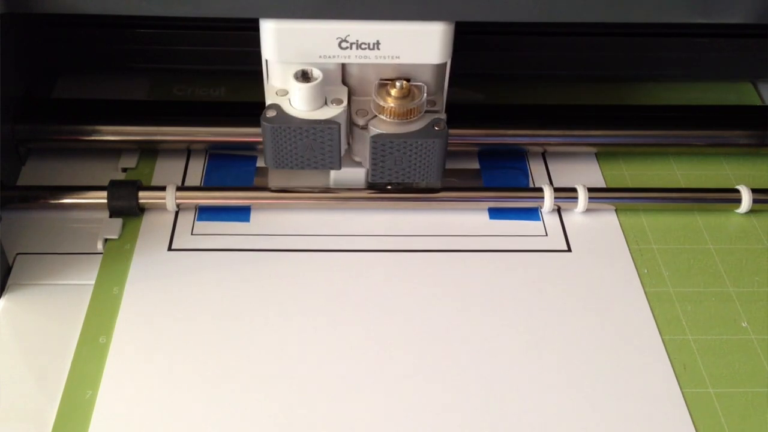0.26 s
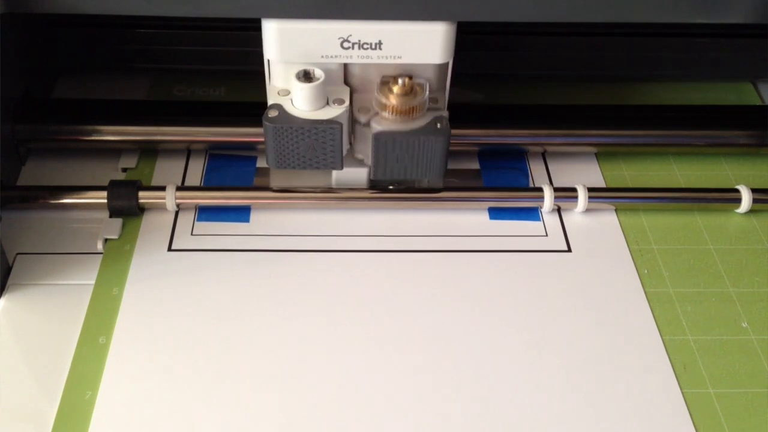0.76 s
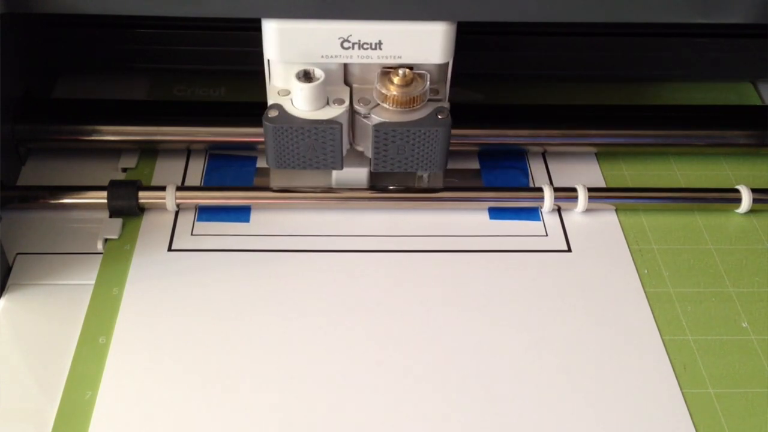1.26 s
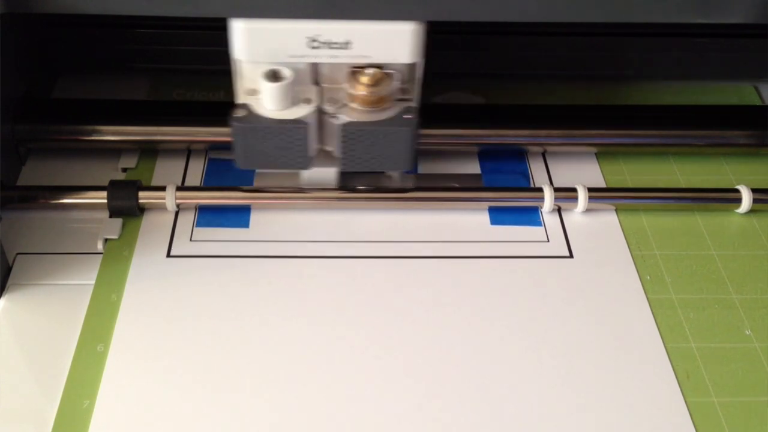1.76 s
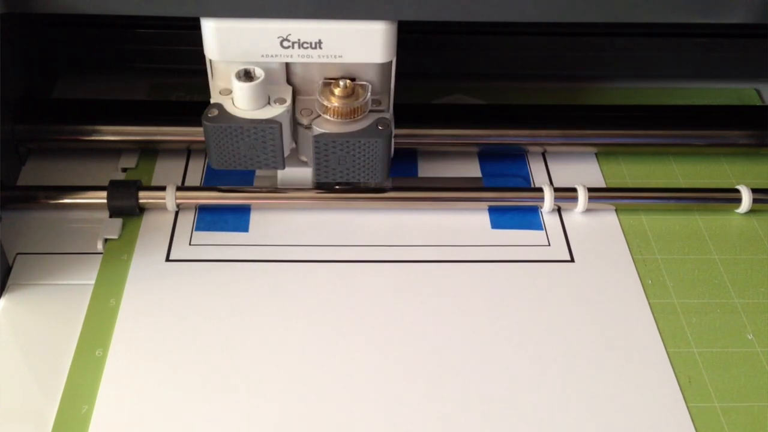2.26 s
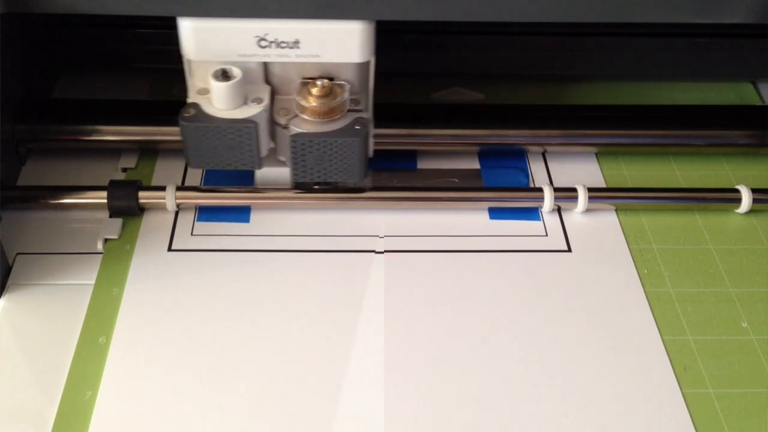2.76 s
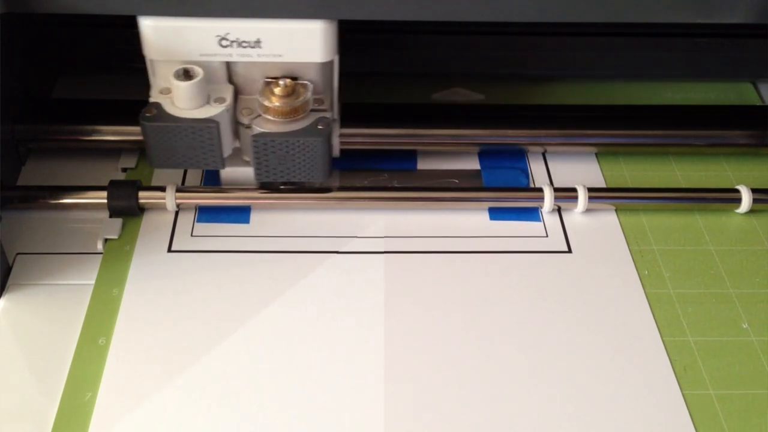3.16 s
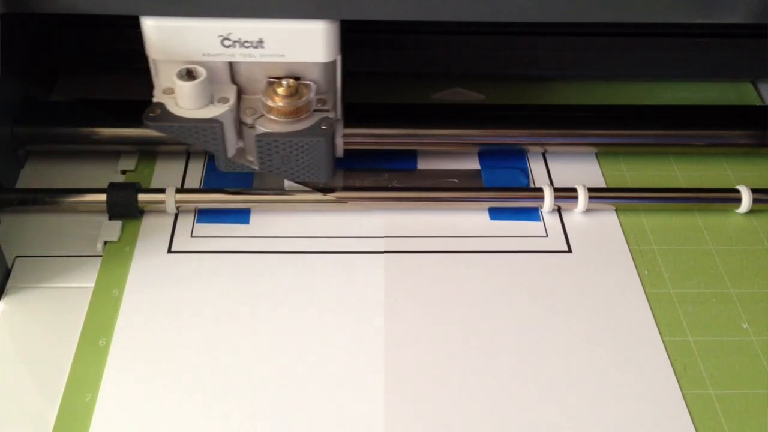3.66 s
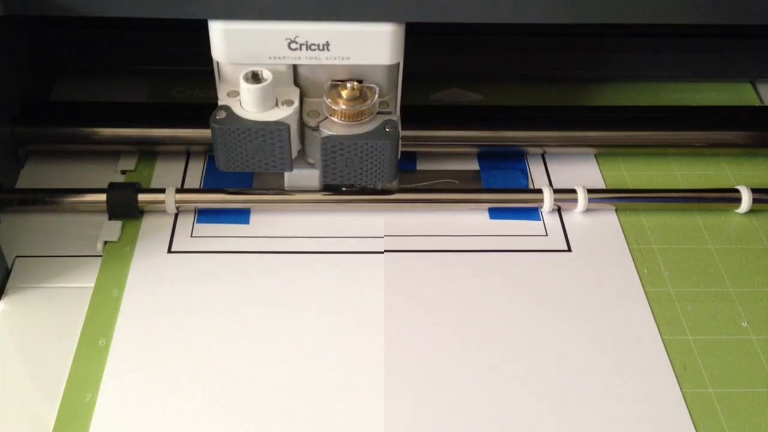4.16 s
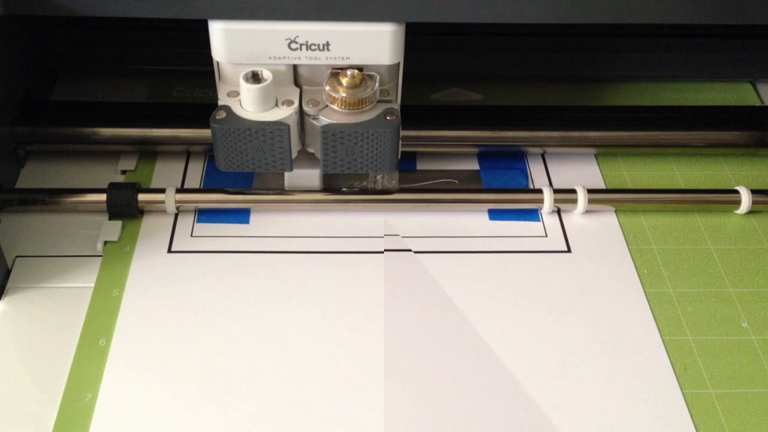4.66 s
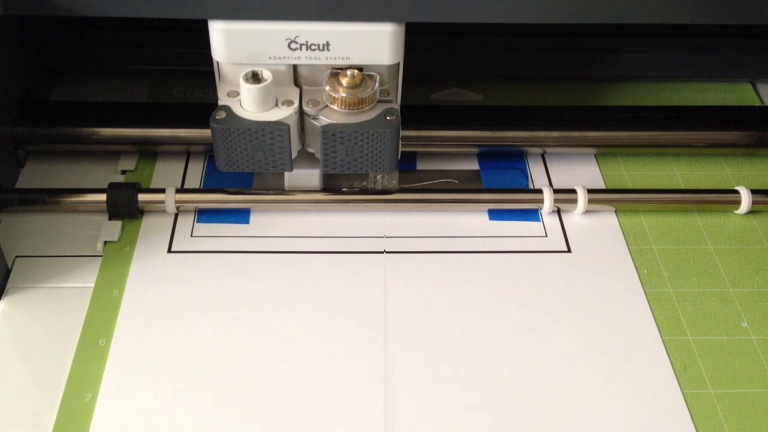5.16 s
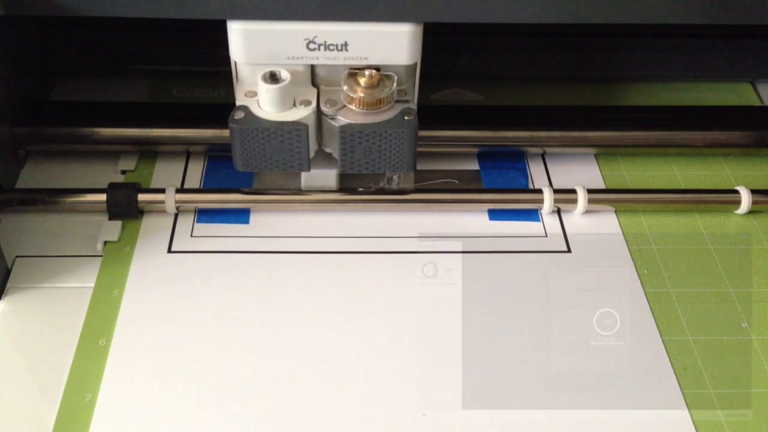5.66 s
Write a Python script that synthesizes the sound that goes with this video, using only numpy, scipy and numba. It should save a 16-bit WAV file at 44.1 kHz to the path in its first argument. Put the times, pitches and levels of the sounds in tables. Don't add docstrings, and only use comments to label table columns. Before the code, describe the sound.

Close in a quiet room, a desktop craft cutter starts with a feed whirr and clustered plastic knocks. A pause, a brisk carriage whirr and another roller burst follow, then uneven ticking and rattling as it engraves metal. Everything fades steadily to near silence, ending with a puff of thin hiss and tiny clicks.

```python
import sys
import numpy as np
from scipy import signal
from scipy.fft import rfft, irfft
from scipy.io import wavfile
from scipy.ndimage import uniform_filter1d
from numba import njit

SR = 44100
rng = np.random.default_rng(int(sys.argv[2]) if len(sys.argv) > 2 else 0)


def materialize(psi):
    bounded = np.clip(np.atleast_2d(psi).T, -1, 1)
    quanta = np.round(bounded * 32767).astype(np.int16)
    wavfile.write(sys.argv[1], SR, quanta)


def amplitude_ratio(level_db):
    exponent = np.asarray(level_db, float) / 20
    return 10 ** exponent


N = 260190

# [start t/s, top speed t/s, stop t/s, whirr level/dB, drone rel. to whirr/dB]
ROLLER_RUNS = [
    (-.06, 0.033, .17, -43, 3),
    (0.736, 0.843, 0.94, -42, -1.5),
    (2.092, 2.244, 2.355, -44, 1),
]
# [f/Hz, width/Hz, level/dB]
CLACK_MODES = [(1930, 200, -3), (2255, 220, 1), (2550, 310, -2), (2884, 270, 0), (3280, 340, -8.5)]


@njit
def svf(x, hz, width):
    y, band, low = np.empty(len(x)), 0., 0.
    g, k = np.tan(np.pi * hz / SR), width / hz
    for i in range(len(x)):
        floor = 1e-15 * (i & 15)
        v = (band + g * (x[i] + floor - low)) / (1 + g * (g + k))
        band = 2 * v - band
        low += 2 * g * v
        y[i] = k * v
    return y


def unit(x):
    return x / np.sqrt(np.mean(x ** 2))


def body(drive, modes):
    power = sum(amplitude_ratio(db) ** 2 * 2 / SR * width for _, width, db in modes)
    out = np.zeros(len(drive))
    for k, (hz, width, db) in enumerate(modes):
        ring = svf(svf(drive, 1. * hz, 1. * width), 1. * hz, 2. * width)
        out += (-1) ** k * amplitude_ratio(db) * ring
    return out / np.sqrt(power)


def level_curve(points):
    off_db = -130
    rows = [(points[0][0] - .006, off_db), *points, (points[-1][0] + .002, off_db)]
    s, db = np.transpose(rows)
    return np.interp(np.arange(N) / SR, s, db)


def coloured(spectrum):
    hz, db = np.transpose(spectrum)
    f = np.arange(N // 2 + 1) * SR / N + 1
    gain = amplitude_ratio(np.interp(np.log(f), np.log(hz), db, right=-90))
    return unit(irfft(rfft(rng.standard_normal(N)) * gain, N))


def rattle(rate, scatter_db):
    at = np.arange(0, N + SR / rate, SR / rate)
    jumps = np.minimum(rng.exponential(size=len(at)), 2.5)
    strength = np.interp(np.arange(N), at, amplitude_ratio(scatter_db * jumps))
    return unit(strength * rng.standard_normal(N))


def swell(t, start, stop, power):
    return np.sin(np.pi * np.clip((t - start) / (stop - start), 0, 1)) ** power


def snap(hz, width, decay_s, noise):
    u = np.arange(len(noise)) / SR / decay_s
    y = svf(svf(noise * u * np.exp(-u), 1. * hz, 1. * width), 1. * hz, 2 * width)
    return y / np.abs(y).max()


def fade_db(t):
    from_s, to_s = 2.06, 5.72
    return 20 * np.log10(np.clip((to_s - t) / (to_s - from_s), 1e-4, 1))


def room_tone():
    # [f/Hz, level per Hz/dB]
    air_colour = [(18, -42), (30, -16.5), (59, -4.5), (140, -13.5), (219, -5.5), (249, -20), (307, -15),
                  (1400, -29.5), (2990, -24.5), (3590, -24), (15500, -26.5)]
    air_db, whistle_db, whistle_hz = -67, -74, 15000
    t = np.arange(N) / SR
    idle = uniform_filter1d(1. * (t > 1.0) * (t < 1.66), size=4000)
    driving = uniform_filter1d(1. * (t > 1.6) * (t < 2.4), size=4000)
    flicker = uniform_filter1d(np.abs(rattle(27, 3.6)), 400)
    tone = flicker * np.sin(2 * np.pi * whistle_hz * t)
    whistle = tone + 0.25 * unit(svf(rng.standard_normal(N), 1. * whistle_hz, 250.))
    air = amplitude_ratio(air_db - 2.0 * idle) * coloured(air_colour)
    whistle = amplitude_ratio(whistle_db + 4 * driving - 3 * idle + .5 * fade_db(t)) * whistle
    return amplitude_ratio(fade_db(t)) * (air + whistle)


def second_microphone():
    # [t/s, level/dB]
    gate = [
        (5.606, -61),
        (5.63, -56.5),
        (5.688, -56),
        (5.694, -65),
        (5.73, -60.5),
        (5.794, -65),
        (5.8, -73),
        (5.9, -78),
    ]
    # [f/Hz, width/Hz, level/dB]
    early_bands = [(5660, 440, -14), (8000, 1300, -5.5), (8540, 510, -2.5), (9700, 1200, -7.5),
                   (11400, 400, -4), (12300, 1000, 1), (13300, 1300, 0), (14900, 1500, -4)]
    late_bands = [(5730, 360, -8.5), (6830, 300, -10), (7670, 560, 0), (9500, 1700, -10), (11200, 400, -5),
                  (12400, 900, 0.5), (13400, 1200, 1), (14800, 1400, -4)]
    # [t/s, snap level/dB, snap f/Hz, ring level/dB]
    clicks = [
        (5.8145, -49.5, 12060, -101),
        (5.8283, -45.5, 5900, -55),
        (5.8755, -62, 10500, -63),
    ]
    hiss_db = level_curve(gate)
    rumble = unit(body(rng.standard_normal(N), [(40., 50., 0)]))
    slide = np.interp(np.arange(N) / SR, (5.68, 5.73), [0, np.pi / 2])
    grain = rattle(200, 0.8)
    early, late = unit(body(grain, early_bands)), unit(body(grain, late_bands))
    out = amplitude_ratio(hiss_db) * (np.cos(slide) * early + np.sin(slide) * late)
    t = np.arange(-800, 800) / SR
    ring = np.zeros(N)
    for s, snap_db, hz, ring_db in clicks:
        i = int(s * SR)
        out[i:i + 300] += amplitude_ratio(snap_db) * snap(hz, hz * 0.83, 0.00039, rng.standard_normal(300))
        tone = np.sin(2 * np.pi * 1500 * t) + amplitude_ratio(snap_db + 25.0) * np.sin(2 * np.pi * 3120 * t)
        envelope = np.exp(-np.abs(t) / 0.0025) + 0.081 * np.cos(t * SR / 510)
        ring[i - 760:i + 840] += amplitude_ratio(ring_db) * envelope * tone
    band = signal.ellip(6, .5, 60, [5150, 15900], "bandpass", fs=SR, output="sos")
    return signal.sosfilt(band, out) + ring + (hiss_db > -100) * amplitude_ratio(-78.5) * rumble


def hums():
    # [start t/s, stop t/s, f/Hz, level/dB]
    holds = [
        (1.653, 1.742, 139.4, -57.5),
        (2.373, 2.538, 130, -56.5),
        (4.964, 5.13, 165.8, -71),
    ]
    t = np.arange(N) / SR
    waver = np.cumsum(unit(svf(rng.standard_normal(N), 8.9, 25.0))) / SR
    out = np.zeros(N)
    for start, stop, hz, db in holds:
        tone = np.sin(2 * np.pi * hz * (t + 0.14 * waver))
        out += amplitude_ratio(db + 9.0) * swell(t, start, stop, 0.47) * tone
    return out


def rubs():
    # [start t/s, stop t/s, f/Hz, width/Hz, level/dB]
    rub_spans = [(3.49, 3.62, 7400, 1400, -65), (2.735, 2.82, 4800, 100, -72), (3.21, 3.26, 9200, 300, -76),
                 (1.73, 1.8, 14500, 900, -70), (2.08, 2.34, 4700, 210, -61), (2.08, 2.22, 8800, 590, -60.5),
                 (.755, .93, 2590, 250, -49.5), (2.75, 3.05, 1250, 32, -58.5),
                 (3.28, 3.34, 1280, 100, -51.5), (2.46, 2.8, 1150, 330, -55),
                 (2.079, 2.096, 1620, 200, -42), (0.92, 1.04, 113, 91, -57), (2.82, 3.05, 4800, 90, -77),
                 (3.36, 3.42, 12400, 400, -74), (.41, 0.5, 1000, 210, -50.5), (2.79, 3.02, 1650, 36, -65.5),
                 (4.49, 4.56, 130, 88, -55), (2.77, 2.83, 138, 43, -52.5), (3.7, 4.16, 137, 29, -64.5),
                 (4.86, 4.96, 134, 40, -64), (1.08, 1.14, 198, 46, -54.5), (2.39, 2.44, 1450, 140, -54.5),
                 (.455, .535, 7000, 4000, -58), (5.47, 5.58, 1250, 89, -82), (2.74, 2.8, 1600, 99, -56),
                 (2.95, 3.4, 650, 150, -61.5), (0.3, 0.4, 1200, 150, -46), (1.64, 1.72, 560, 71, -54.5),
                 (2.08, 2.395, 5400, 110, -62.5), (4.83, 4.86, 1270, 130, -56), (1.97, 2.04, 100, 78, -59),
                 (3.78, 3.9, 1060, 80, -63), (.745, 0.952, 3350, 200, -49.5),
                 (0.7115, .726, 3310, 90, -49.5), (.78, 0.927, 1700, 252, -53), (.828, .875, 340, 150, -39),
                 (1.075, 1.095, 1540, 130, -44.5), (2.18, 2.33, 3350, 140, -57.5),
                 (2.19, 2.3, 2450, 200, -53), (2.385, 2.43, 2500, 1200, -64)]
    t = np.arange(N) / SR
    out = np.zeros(N)
    for start, stop, hz, width, db in rub_spans:
        friction = amplitude_ratio(db) * swell(t, start, stop, 0.51) * rattle(90, 4.3)
        out += body(friction, [(hz, width, 0)])
    return out


def roller_levels():
    # [t/s, whirr level/dB]
    jolts = [
        (0.047, -45),
        (0.12, -44.5),
        (0.755, -46),
        (0.826, -35.5),
    ]
    slow_db = (14.5, 20, 16)
    brush_db = -5
    t = np.arange(N) / SR
    out = np.zeros((3, N))
    for start, top, stop, db, drone_db in ROLLER_RUNS:
        ramp = np.where(t < top, (top - t) / (top - start), (t - top) / (stop - top))
        slow = np.clip(ramp, 0, 1)
        ends_db = 450 * np.clip(t - stop, 0, None) + 40 * np.clip((start - t) / 0.015, 0, None)
        relative_db = np.array([[0], [drone_db], [brush_db]])
        out += amplitude_ratio(db + relative_db - np.outer(slow_db, slow) - ends_db)
    for s, db in jolts:
        out[0] += amplitude_ratio(db) * np.exp(-np.abs(t - s) / 0.0053)
    return out


def rollers():
    # [f/Hz, width/Hz, level/dB]
    whirr_modes = [(1002, 45.1, -10), (1753, 250, -8), (2280, 190, -11.5), (2500, 190, -2),
                   (2800, 180, -10.5), (3330, 230, 0), (3600, 1400, -13)]
    drone_modes = [(75.5, 93, -20.5), (248, 55, -10.5), (339, 80, -5), (570, 60, -4), (636, 304, -7)]
    brush_modes = [(5300, 160, 5), (7000, 7600, -5), (9290, 850, 4), (11000, 13500, -8.5),
                   (14000, 2000, -18)]
    frame_hz, frame_waver, frame_db = 568, .09, 0
    whirr, drone, brush = roller_levels()
    pulling = np.abs(np.arange(N) / SR - ROLLER_RUNS[1][1]) > .5
    chatter = rattle(180, 4.1)
    waver = 1 + frame_waver * unit(svf(rng.standard_normal(N), 40., 120.))
    tone = np.sin(2 * np.pi * frame_hz * np.cumsum(waver) / SR)
    sing = unit(tone * uniform_filter1d(np.abs(rattle(60, 2)), size=600))
    return (body(whirr * chatter, whirr_modes)
            + body(drone * rattle(50, 5.2), drone_modes)
            + amplitude_ratio(frame_db) * pulling * drone * sing
            + body(brush * (0.61 * chatter + 1.03 * rattle(300, 4.5)), brush_modes))


def ticks():
    # [t/s, peak level/dB, ring f/Hz]
    small_ticks = [(0.821, -28, 3330), (2.087, -46, 8830), (2.121, -45, 5270), (2.147, -41.5, 8900),
                   (2.163, -40.5, 8900), (2.309, -31.5, 3330), (0.264, -48, 4560), (0.303, -52, 7700),
                   (3.152, -60, 4300), (3.369, -58, 12400), (3.386, -67, 12400), (3.58, -51.5, 11400),
                   (4.263, -57, 3900), (4.987, -61, 5200), (2.3753, -51, 5350), (2.618, -55, 4790),
                   (2.6367, -34.5, 3980), (2.735, -53.5, 4750), (2.81, -53, 4600), (2.9316, -59, 4360),
                   (3.0088, -56, 4340), (3.214, -56, 4160), (3.232, -55, 4200), (3.4905, -51.5, 5200),
                   (3.578, -58, 6800), (3.8106, -58, 4270), (4.262, -52.5, 6530), (4.3403, -53.5, 4140),
                   (4.6511, -63.5, 4560), (4.7175, -61, 6300), (4.797, -60, 6240), (5.024, -59, 6340)]
    # [t/s, peak level/dB]
    belt_seats = [(.2558, -50.5), (.3755, -53), (.401, -50.5), (0.5066, -51), (.5666, -61), (2.3733, -47.5),
                  (2.4264, -57), (2.5198, -46), (2.5671, -57), (2.607, -57), (2.638, -50), (3.3204, -57),
                  (3.3712, -58), (3.493, -47.5), (3.5199, -55), (3.545, -60), (3.565, -55), (3.5795, -41),
                  (3.5994, -64)]
    # [t/s, peak level/dB]
    belt_creeps = [(4.3648, -66), (4.3987, -62), (4.4172, -62), (4.4621, -67), (4.498, -66), (4.5554, -67),
                   (4.5873, -67), (4.6033, -65), (4.6207, -67), (4.6601, -68), (4.6811, -63), (4.7175, -77),
                   (4.7983, -73), (4.8118, -63), (4.8517, -66), (4.863, -66), (4.8767, -62), (4.891, -68),
                   (4.9231, -69), (4.9714, -72), (5.0084, -69), (5.0548, -73), (5.0642, -71), (5.09, -77),
                   (5.1376, -71), (5.1585, -75), (5.2004, -72), (5.2832, -77), (5.3606, -80), (5.373, -80),
                   (5.4419, -76), (5.4928, -79), (5.404, -79), (5.556, -85)]
    # [t/s, peak level/dB, ring f/Hz]
    guide_rings = [(0.0437, -34, 2550), (0.1105, -28.5, 3260), (0.1815, -46, 2280), (0.3033, -30.5, 2330),
                   (0.4619, -27.5, 2334), (0.4893, -27, 2240), (1.081, -38.5, 2800), (2.3565, -53, 3480),
                   (2.531, -43, 2850), (2.6314, -26.5, 2320), (2.6584, -32, 2420), (2.7661, -37.5, 2280),
                   (3.1667, -63, 2240), (3.2535, -32, 2460), (3.388, -49, 2910), (3.4441, -58, 2140),
                   (3.4555, -50, 2820), (3.472, -48, 2340), (3.4905, -46, 3400), (3.5703, -52, 2050),
                   (3.6173, -40.5, 2620), (3.65, -58, 2560), (3.8092, -33.5, 2890), (4.224, -32.5, 2860),
                   (4.2737, -36.5, 2800), (4.3151, -54, 2190), (4.5, -48, 2850), (4.5141, -46, 2900),
                   (4.5455, -35.5, 2800), (4.593, -59, 2240), (4.6184, -60, 2420), (4.7177, -51, 3300),
                   (4.7321, -54, 2430), (4.744, -55, 2840), (4.7611, -53, 2440), (4.774, -50, 2100),
                   (4.8763, -58, 2860), (4.9044, -57, 3330), (4.9901, -58, 2440), (5.01, -52, 2450),
                   (5.0345, -47, 2930), (5.0433, -42, 2860), (5.103, -50, 2980), (5.2131, -61, 2870),
                   (5.3038, -74, 2150), (5.3268, -66, 2120), (5.3877, -64, 2160), (5.426, -63, 2460)]
    # [t/s, peak level/dB]
    mat_snaps = [(2.087, -46), (2.121, -41), (3.107, -62), (3.328, -58), (4.972, -66), (2.6385, -37),
                 (4.1494, -69), (4.223, -64), (4.273, -60), (4.331, -62), (4.5455, -62), (4.7187, -63),
                 (4.799, -69), (4.9487, -63), (5.0549, -64), (5.0644, -60), (5.092, -57), (5.1382, -59),
                 (5.1587, -63), (5.177, -59), (5.2001, -64), (5.2829, -75), (5.374, -62)]
    belt_hz = 7630
    # t/s, level/dB, f/Hz, width/Hz, decay/s
    rows = [(s, db, hz, 0.1 * hz, .0015) for s, db, hz in small_ticks]
    rows += [(s, db - 4.0, hz, 0.92 * hz, .0006) for s, db, hz in small_ticks]
    rows += [(s, db, belt_hz, 550., .0017) for s, db in belt_seats]
    rows += [(s - .0015, db - 1.5, belt_hz, 600., .0015) for s, db in belt_creeps]
    rows += [(s - .0025, db - 6.5, hz, 0.064 * hz, 0.002) for s, db, hz in guide_rings]
    rows += [(s, db, 7200., 6500., .0008) for s, db in mat_snaps]
    out = np.zeros(N + 900)
    noise = rng.standard_normal((len(rows), 900))
    for (s, db, hz, width, decay_s), grit in zip(rows, noise):
        i = int(s * SR)
        out[i:i + 900] += amplitude_ratio(db) * snap(hz, width, decay_s, grit)
    return out[:N]


def knocks():
    # [t/s, casing peak level/dB, thud rel./dB, clack rel./dB]
    dull_knocks = [(.1138, -49, -4, 10), (.303, -33, -8.5, -5.5), (.382, -39, -4.5, -5),
                   (.4871, -25.5, -16.5, -8.5), (.5156, -25.5, -12.5, -18), (.5322, -28, -10.5, -8),
                   (.661, -49, -12, -9), (1.078, -36.5, -15, -10.5), (1.677, -35, -14.5, -8.5),
                   (2.082, -36, -26, -15), (.179, -34.5, -8.5, -3), (.325, -31, -7, -7),
                   (.457, -27.5, -13, -7), (.468, -30, -13, -4), (2.549, -39, -18, -22),
                   (2.655, -34, -7, -5), (3.469, -46.5, -9, -8.5), (4.496, -47, -13, -2),
                   (4.512, -48.5, -8, 0), (4.874, -51.5, -8, -9), (4.893, -54.5, -2.5, -9),
                   (5.039, -48.5, -13, -1), (5.101, -48, -11, -6.5), (5.387, -59, -9, -3),
                   (4.2715, -38.5, -12, -4), (2.535, -34, -15.5, -18), (2.582, -50, -29, -27),
                   (2.764, -32.5, -12.5, -6), (3.2522, -29, -23.5, -13.5), (3.357, -40, -27, -21),
                   (3.3858, -35.5, -31, -18), (3.397, -39, -12, -19), (3.618, -49.5, -8.5, 2),
                   (3.8063, -39.5, -7.5, 4), (4.223, -37.5, -18, -8), (4.332, -38, -18, -16),
                   (4.428, -46, -33, -17), (4.5423, -45, -13, 3.5), (4.773, -54.5, -3, -2),
                   (4.8293, -42, -17, -13.5), (5.2165, -64, -0.5, -3), (5.3257, -56, -17, -10),
                   (5.415, -61.5, -10, -5)]
    sharp_knocks = [(.0386, -34, -9.5, -3.5), (.191, -33.5, -1.5, 1.5), (.3383, -27, -5, -5),
                    (.7137, -59, 2.5, -18.5), (.8366, -38, 0.5, -1), (1.631, -50, -1.5, -5.5),
                    (2.234, -47.5, 2.5, 9.5), (2.311, -46, -6, 4), (2.379, -44, -1.5, -14),
                    (2.63, -36, -7, -1), (3.571, -46, -12.5, -14), (4.797, -55, 2, -2)]
    slow_knocks = [(.2527, -38.5, -9, -8.5), (.425, -37.5, -13, -16), (.835, -49.5, 8, -12),
                   (1.155, -62.5, -3.5, -8), (2.7465, -37.5, -24, -20), (3.487, -49, -5.5, -13),
                   (3.788, -41.5, -22, -6.5), (4.614, -52, -10, -13), (4.6428, -50, -10.5, -12),
                   (4.7266, -53, -6, -4.5), (4.9795, -52.5, -8, -8), (5.022, -55.5, -1.5, -2)]
    # [f/Hz, width/Hz, level/dB]
    casing_modes = [(1071, 100, 2.5), (1230, 54.5, 5.5), (1498, 336, 5.1), (1609, 342, 2.7)]
    thud_modes = [(130, 87, -1.5), (167.2, 104, 0.5), (270.6, 131, -3.5), (336, 101, 0.5), (548, 142, -4.5),
                  (740, 240, -8)]
    crack_modes = [(3830, 860, 2), (4996, 600, -2), (6420, 2500, -7.5), (7670, 2100, -8),
                   (10500, 5700, -13)]
    # length/s, crack level/dB, share of the clack dB that the crack follows
    kinds = ((dull_knocks, 0.0055, -23.5, 0.36),
             (sharp_knocks, 0.0069, -6.5, 0.61),
             (slow_knocks, 0.011, -18, 0.78))
    t = np.arange(int(.08 * SR)) / SR
    rows = []
    for table, length, crack_db, share in kinds:
        rows += [(*row, crack_db + share * row[3], length) for row in table]
    drive = np.zeros((4, N + len(t)))
    noise = rng.standard_normal((len(rows), len(t)))
    for (s, db, thud_db, clack_db, crack_db, length), impacts in zip(rows, noise):
        i = int((s - .005) * SR)
        # relative dB, lateness, stretch
        parts = ((0, .01, 1), (thud_db + 5.5, .5, 1.6), (clack_db - 2.5, .01, .9), (crack_db + 3.5, .3, .55))
        for line, (rel_db, late, stretch) in zip(drive, parts):
            cluster = np.exp(-((t / length - 1.5 - late) / stretch / 1.05) ** 2)
            line[i:i + len(t)] += amplitude_ratio(db + rel_db - 3.5) * cluster * impacts
    casing, thud, clack, crack = drive[:, :N]
    return (body(casing, casing_modes) + body(thud, thud_modes)
            + body(clack, CLACK_MODES) + body(crack, crack_modes))


def move_levels(rows):
    coasts = (430, 129.5, 653.5)
    t = np.arange(N) / SR
    out = np.full((3, N), -130.)
    for start, off, db, rumble_db, tooth_db in rows:
        start_db = 60 * np.clip((start - t) / 0.011, 0, None)
        for k, (rel_db, coast) in enumerate(zip((0, rumble_db, tooth_db), coasts)):
            run = db + rel_db - coast * np.clip(t - off, 0, None) - start_db
            out[k] = np.maximum(out[k], run)
    return out


def engraving_levels():
    # [t/s, gear rattle level before the fade/dB]
    load = [(2.38, -55), (2.82, -53.5), (2.99, -57.5), (3.2, -60), (3.27, -48.5), (3.4, -52.5),
            (3.43, -56.5), (3.57, -59.5), (3.76, -59.5), (3.9, -52), (4.05, -60), (4.27, -56.5),
            (4.41, -54.5), (4.74, -54), (5.04, -57.5), (5.17, -52), (5.39, -57), (5.6, -66)]
    rumble_db, tooth_db, follow = -55, -69.5, 0.18
    load_db = level_curve(load)
    swing = np.where(load_db > -100, follow * (load_db - np.mean(load, axis=0)[1]), -80)
    return np.array([load_db, rumble_db + swing, tooth_db + swing]) + fade_db(np.arange(N) / SR)


def gear_train(levels, gearbox, loose_db, grit_db, steady):
    # [f/Hz, width/Hz, level/dB]
    tooth_modes = [(3585, 180, -2), (4063, 130, 2), (4314, 150, 0), (4500, 160, 0.5), (4750, 190, 1),
                   (5200, 180, -4), (9060, 380, -10), (9750, 430, -13.5)]
    table_modes = [(55, 35, -4.5), (136, 37, -5), (172, 40, 0), (255, 60, -9), (340.5, 217, -5.5)]
    tooth_hz, tooth_at_s = 125.4, 1.82
    gear_db, rumble_db, tooth_db = levels
    running = gear_db > -110
    phase = (tooth_hz * (np.arange(N) / SR - tooth_at_s)) % 1
    gears = amplitude_ratio(gear_db) * unit((1.0 + np.exp(-phase / 0.25)) * np.abs(rattle(90, loose_db)))
    power = np.array([amplitude_ratio(db) ** 2 * width for _, width, db in gearbox])
    ringing = np.zeros(N)
    for share, mode in zip(power / power.sum(), gearbox):
        ringing += np.sqrt(share) * body(gears * rattle(8, .3 * loose_db), [mode])
    strike = rattle(120, loose_db + 2.0)
    repeated = strike[(phase * SR / tooth_hz).astype(int)]
    strike = strike + steady * unit(repeated)
    teeth = unit((0.23 + np.exp(-phase / 0.22)) * strike)
    flutter = unit(uniform_filter1d(np.abs(teeth), size=500) ** (2 - steady))
    tooth_drive = running * amplitude_ratio(tooth_db - 34) * teeth
    hiss = np.zeros(N)
    for k, (hz, width, db) in enumerate(tooth_modes):
        fluttering = tooth_drive * np.roll(flutter, k * N // 9)
        hiss += amplitude_ratio(db) * np.sqrt(width) * body(fluttering, [(hz, width, 0)])
    grit = body(amplitude_ratio(gear_db + grit_db) * rattle(110, 8.0), CLACK_MODES)
    rumble = body(running * amplitude_ratio(rumble_db) * rattle(30, 4.2), table_modes)
    return ringing + grit + hiss + rumble


def carriage():
    # [start t/s, power off t/s, gear rattle level/dB, table rumble rel./dB, tooth hiss rel./dB]
    strokes = [
        (0.0, .12, -54, -23, 0),
        (.2, .3, -59, 7.5, -6),
        (.33, .43, -52, 2, -11),
        (.47, .56, -52.5, -1, -16),
        (.657, .88, -62.5, -2, -21),
        (.84, .9, -63.5, 9, -17),
        (1.06, 1.18, -82, 10.5, -3),
        (2.12, 2.37, -62.5, -4, -6),
        (2.45, 2.56, -55, -8, -25),
    ]
    traverse = [
        (1.633, 1.73, -55.5, -1, -13.5),
        (1.736, 1.77, -40, -13.5, -10),
        (1.765, 1.918, -37, -14.5, -15),
        (1.93, 1.961, -44, -4.5, -18),
    ]
    # [f/Hz, width/Hz, level/dB]
    gearbox = [(570, 200, -11), (800, 250, -16), (1050, 60, -9), (1250, 55, 0), (1480, 70, -7),
               (1640, 65, -3), (1950, 300, -15), (2280, 180, -13), (2900, 900, -25)]
    gearbox_fast = [(580, 294, -13), (1073, 56, -4), (1251, 60, 0.5), (1307, 59, -8), (1448, 74, -7),
                    (1645, 53, 2), (1760, 490, -15), (2250, 79, -11)]
    levels = np.maximum(move_levels(strokes), engraving_levels())
    normal = gear_train(levels, gearbox, loose_db=3.2, grit_db=-20.5, steady=.6)
    fast = gear_train(move_levels(traverse), gearbox_fast, loose_db=0.6, grit_db=-32.0, steady=.8)
    return normal + fast


def short_room(machine):
    t60_s, room_db = .085, -16
    t = np.arange(int(.4 * SR)) / SR
    tail = rng.standard_normal(len(t)) * amplitude_ratio(-60 * t / t60_s) * (t > .004)
    tail = signal.lfilter([1], [1, -.6], tail)
    return amplitude_ratio(room_db) * signal.fftconvolve(machine, tail / np.sqrt(np.sum(tail ** 2)))[:N]


def scene():
    machine = hums() + rubs() + rollers() + ticks() + knocks() + carriage()
    return (room_tone() + second_microphone() + short_room(machine) + machine)[None]


def top_cut(x):
    return signal.sosfilt(signal.butter(12, 16200, fs=SR, output="sos"), x)


def record(dry):
    cut = signal.sosfilt(signal.ellip(10, .2, 40, 15250, fs=SR, output="sos"), dry)
    first = np.arange(N) < 5.6 * SR
    return top_cut(np.where(first, cut, dry))


dry = scene()
out = record(dry)
materialize(out)
```